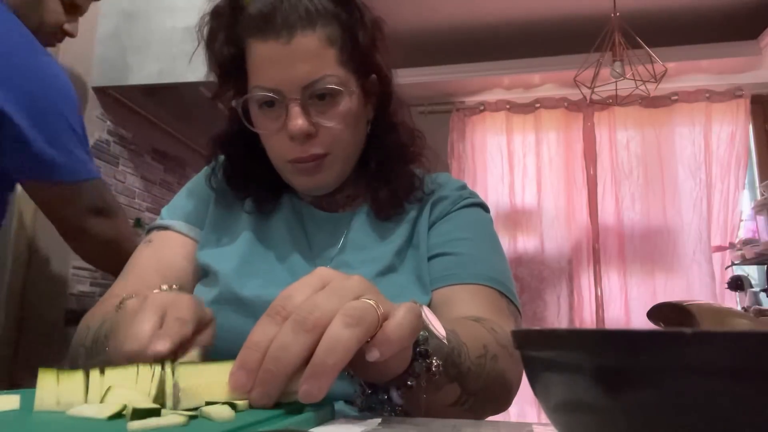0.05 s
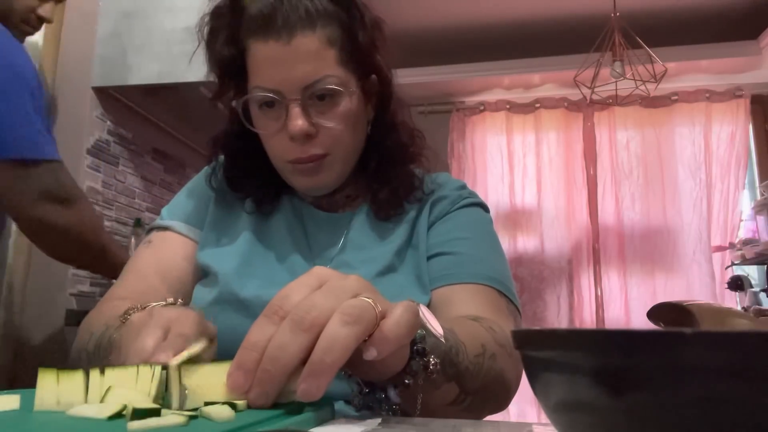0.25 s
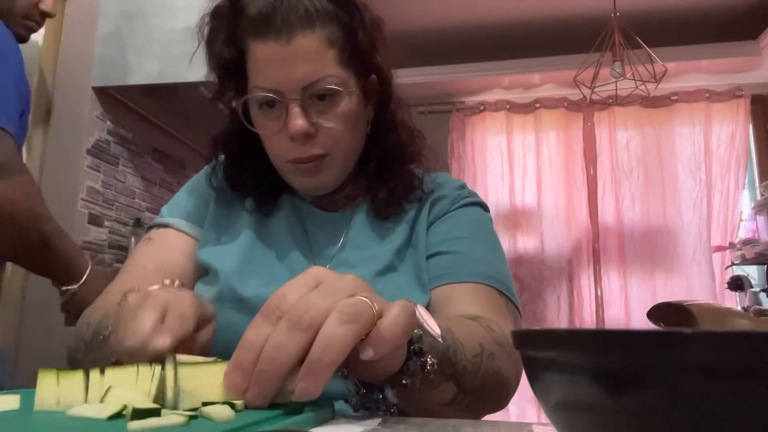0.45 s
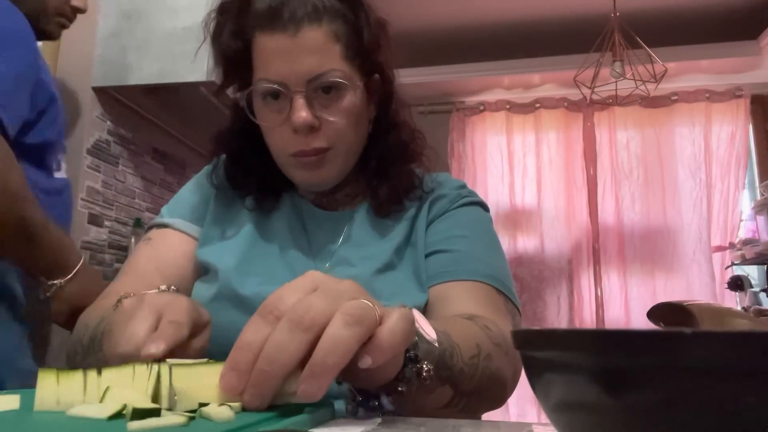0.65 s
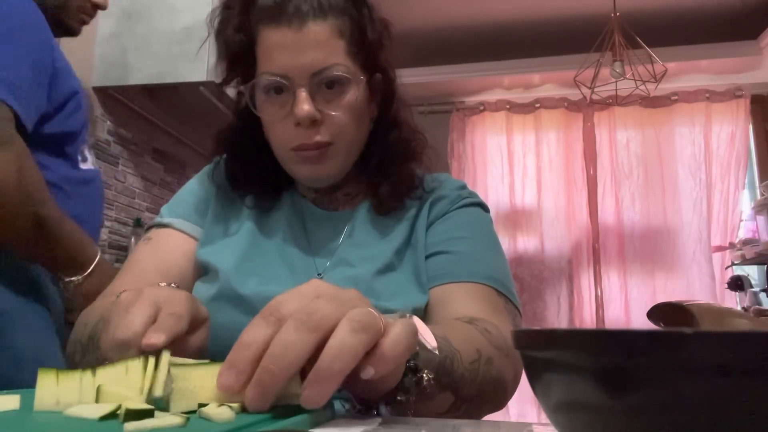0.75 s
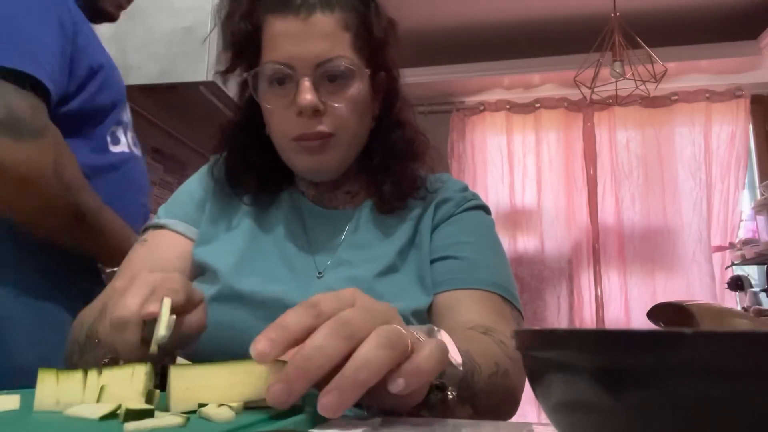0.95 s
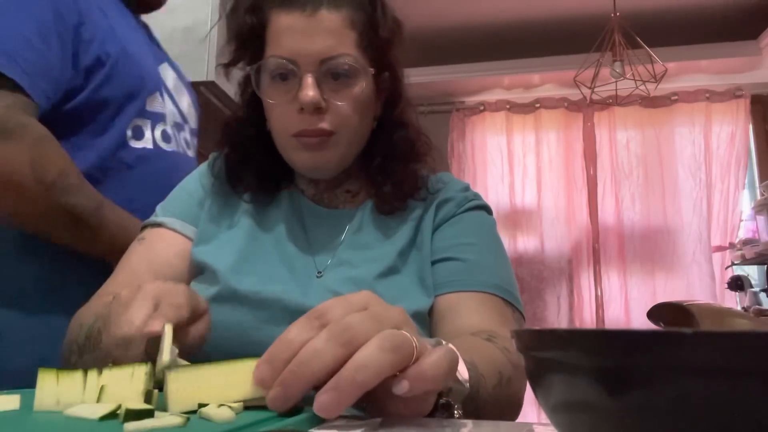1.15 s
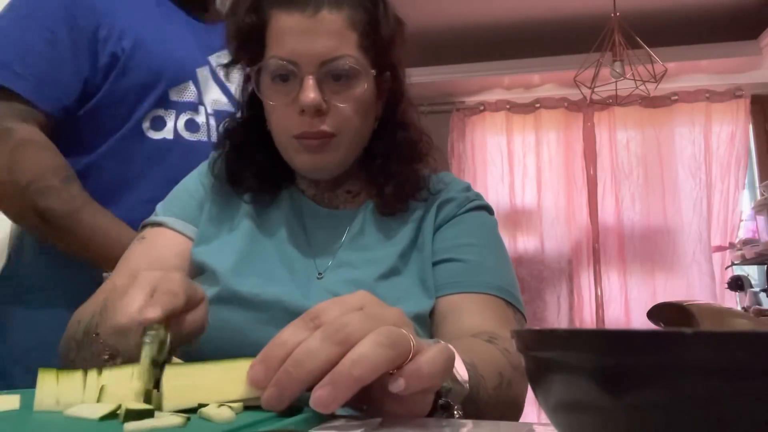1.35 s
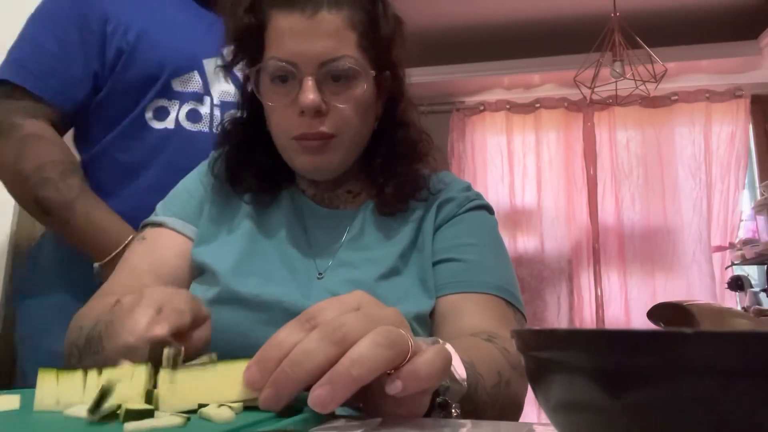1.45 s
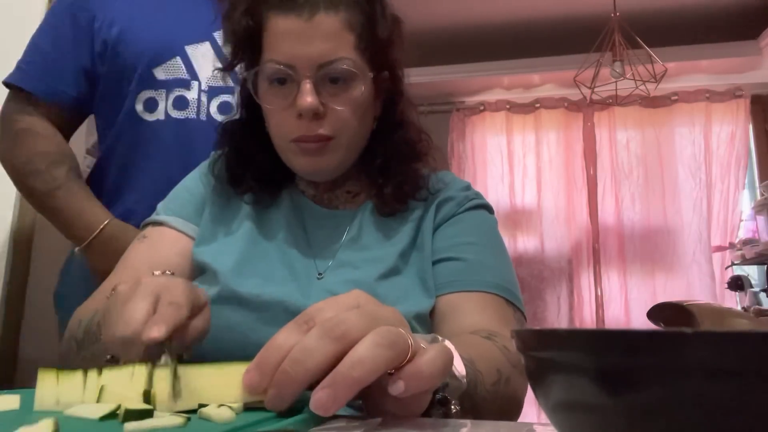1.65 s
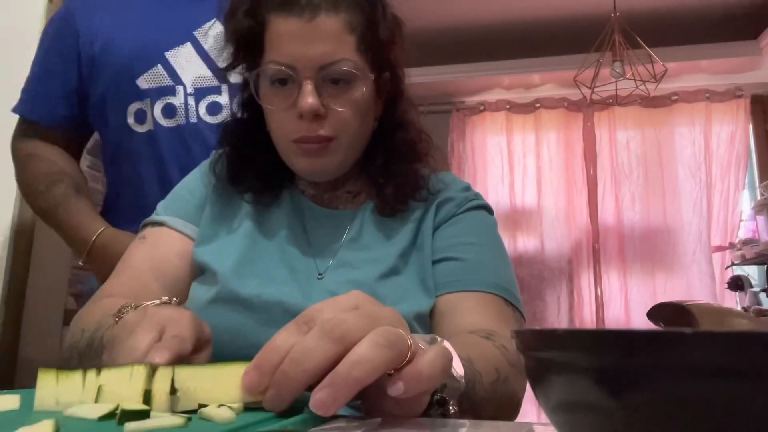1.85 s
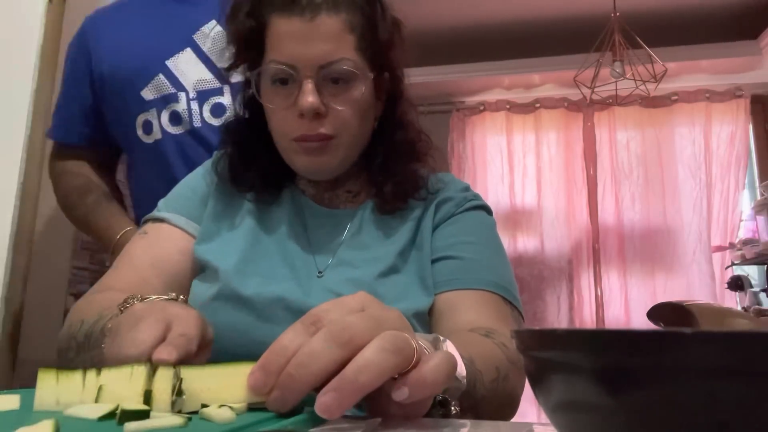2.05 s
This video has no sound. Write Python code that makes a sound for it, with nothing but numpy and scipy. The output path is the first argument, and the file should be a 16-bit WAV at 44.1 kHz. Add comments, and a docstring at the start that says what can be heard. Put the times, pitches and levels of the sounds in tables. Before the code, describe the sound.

A knife chops courgette on a plastic board, with a drawer and cupboard sounding behind.

```python
"""Courgette diced on a plastic board on a kitchen table, close to a stereo pair of microphones. A light tap,
then the blade hisses through the flesh and clacks on the board, while farther back something rattles and rolls
like a drawer. Two more chops, each led in by a faint swell, follow among small taps and distant wooden knocks;
the table booms softly under the hands. Near 1.8 s, with a last, softer chop, a cupboard door thuds across the
room. Quiet room tone lies under it all."""
import sys
import numpy as np
from scipy import signal
from scipy.fft import rfft, irfft
from scipy.io import wavfile
from scipy.ndimage import uniform_filter1d

SR = 44100
rng = np.random.default_rng(int(sys.argv[2]) if len(sys.argv) > 2 else 0)


def generate_wav(sig):
    """Save sig (samples, or channels by samples) to the path in sys.argv[1] as 16-bit PCM at SR."""
    pcm = np.round(np.clip(np.atleast_2d(sig).T, -1, 1) * 32767).astype(np.int16)
    wavfile.write(sys.argv[1], SR, pcm)


N = 92610

# Blade meets board: start_s, level_db, cutoff_hz, tick_db, low_modes_db, room_db
CHOPS = [(0.2466, 0.5, 3348, -28, -18.5, -1.5), (0.4887, 0.5, 3000, -31.5, -22.5, -3),
         (1.213, 0, 3560, -20.5, 1, 0), (1.7790, -5.5, 1944, -25, -11, -29)]
# Light touches of blade and dice: start_s, level_db, cutoff_hz
TAPS = [(.004, -27, 3056), (0.698, -36.5, 2500), (1.081, -46, 4070), (1.181, -33.5, 4960),
        (1.463, -37, 4500), (1.482, -44, 4070), (1.644, -36, 1750)]
# Modes of the board: pitch_hz, level_db, t60_s, left_over_right_db
BOARD_MODES = [(177, -23.5, 0.015, -7), (410, -29.5, 0.031, -7), (822, -22.5, 0.05, 13),
               (1220, -23, 0.036, -0.5), (1338, -8.5, 0.015, 8), (2032, -5.5, 0.01, 2),
               (2410, -11.5, 0.016, -3.5), (2770, -11, 0.0083, -6), (3840, -26, 0.018, -3)]
# Bright tick as heard, with a deep notch at 9 kHz: frequency_hz, level_db
TICK_COLOUR = [(1500, -7.5), (3800, 14.5), (5000, 3.5), (7300, 8.5), (9000, -31), (11500, 6.5),
               (16000, -32)]
# Reflections off the table top and hands: delay_s, left_gain, right_gain
NEAR_ECHOES = [(.0026, 0.23, -.1), (.0052, -0.03, 0.088), (.0088, 0.097, 0.065), (0.012, -.04, .04)]
# The kitchen's answer to a chop: frequency_hz, level_db
TAIL_COLOUR = [(60, -14), (200, -9), (450, -2), (800, 4), (1300, 4), (1900, -2.5), (2600, -9.5),
               (3600, -13.5), (5000, -30), (7500, -27.5), (12000, -40.5), (16000, -49)]
# Brief hisses between the chops, and faint swells leading into two of them: start_s, hold_s, level_db,
# tilt_db_per_octave
HISSES = [(0.188, 0.024, -40.5, -3.5), (.481, 0.012, -29, -5.5), (0.923, 0.038, -64.5, 2.5),
          (1.034, 0.029, -68, 9), (1.177, 0.011, -50.5, -4), (1.201, 0.0081, -30, -4.5),
          (1.502, 0.022, -37, -1.5), (1.761, 0.037, -50.5, 5.5), (1.93, 0.043, -57.5, 4)]
# Hiss as heard, with a deep notch at 9 kHz: frequency_hz, level_db
HISS_COLOUR = [(300, -3), (1200, 0), (2000, -5), (2800, 3), (4000, 4), (5000, 1.5), (6800, 1), (9000, -20),
               (11500, -3), (16000, -24)]
# Hands pushing on the table: start_s, boom_db, thump_db
PUSHES = [(.005, -45, -48), (0.168, -47.5, -48), (0.272, -39, -50), (.355, -40, -64), (0.424, -40, -67.5),
          (0.505, -35.5, -36), (0.659, -47, -39), (1.185, -34, -31), (1.217, -36, -51), (1.4, -43, -50.5),
          (1.469, -37, -32), (1.505, -63, -33), (1.619, -33.5, -33.5), (1.653, -35, -66),
          (1.745, -38.5, -59), (1.815, -39, -34.5)]
# Rattle of the drawer's contents: frequency_hz, level_db
RATTLE_COLOUR = [(100, -36.5), (500, -17.5), (780, 14), (1400, 1), (2500, -7), (3600, 1), (5000, -11.5),
                 (6500, -9), (7700, -18.5), (9000, -19), (10500, -7), (13000, -8.5), (14200, -34.5)]
# Decay of the rattle: frequency_hz, t60_s
RATTLE_T60 = [(500, 0.13), (3000, 0.14), (7000, 0.56), (13000, 0.15)]
# Metal ringing in the drawer: pitch_hz, level_db, t60_s
METAL_MODES = [(1810, -42.5, .45), (3506, -43, 0.67), (3800, -47.5, .4), (5000, -45, .42),
               (6470, -44.5, .38), (7630, -32, .26), (11150, -42.5, 0.21)]
# Roll of the runners: frequency_hz, level_db
ROLL_COLOUR = [(50, -22), (130, -8), (230, 1.5), (330, -9), (550, -8.5), (760, -4.5), (920, -8),
               (1200, -9.5), (1600, -16), (3500, -24), (8000, -49)]
# Decay of the roll: frequency_hz, t60_s
ROLL_T60 = [(200, 0.57), (700, 0.41), (3000, 0.083)]
# Hollow resonances of the drawer: pitch_hz, width_hz, level_db
HOLLOW_MODES = [(233.5, 16, -40.5), (638, 40, -38), (730, 47, -38.5), (880, 26, -42.5), (1258, 90, -46.5)]
# Knocks on cupboard wood across the room: start_s, level_db, tilt_db_per_octave
KNOCKS = [(0.094, -40, -4), (.655, -41, -2.5), (.745, -46, -8), (.805, -46.5, -3), (.915, -59.5, 5),
          (1.104, -48.5, -9.5), (1.768, -23, -4), (1.784, -24, -5), (1.806, -45.5, 9),
          (1.875, -38.5, -10.5)]
# Modes of the cupboard: pitch_hz, level_db, t60_s
CUPBOARD_MODES = [(275.5, -4, 0.24), (325.5, -10, 0.27), (401.8, -3, 0.17), (502, -10, 0.42),
                  (655, -7, 0.33), (717, -8.5, 0.43), (864.5, -12, 0.32)]
# Room blur around a knock: frequency_hz, level_db
KNOCK_COLOUR = [(50, -25), (130, -13.5), (280, -8.5), (330, -11.5), (400, 1.5), (450, -15), (560, -3),
                (690, 1.5), (950, -5), (1200, -4), (1900, -11.5), (2800, -23.5), (6000, -33.5),
                (14000, -59)]
# Decay of that blur: frequency_hz, t60_s
KNOCK_T60 = [(150, 0.44), (700, 0.35), (2000, 0.28), (10000, 0.29)]
# Kitchen reverberation of the hisses: frequency_hz, level_db
ROOM_COLOUR = [(60, 0), (300, 4), (700, 2), (1400, -6.5), (2500, -17), (5000, 1), (15000, 12)]
# Decay of the kitchen: frequency_hz, t60_s
ROOM_T60 = [(100, 0.3), (500, 0.46), (1300, 0.44), (3000, 0.46), (12000, 0.25)]
# Room tone: frequency_hz, level_db
AIR_COLOUR = [(25, -10), (70, -6.5), (200, -4.5), (500, -7), (1000, -12.5), (2500, -22.5), (6000, -30),
              (12000, -33.5), (16000, -43.5)]
# Rise and fall of the room tone: time_s, level_db
AIR_LEVEL = [(0, 14.5), (.7, 8), (0.951, 4), (1.121, -2.5), (1.4, 10.5), (1.699, 10), (2.1, 5.5)]
# Likeness of the sound at the two microphones: frequency_hz, correlation
MIC_CORRELATION = [(60, .9), (250, 0.68), (650, -0.12), (1400, 0.09), (3000, 0.17), (7000, -0.38),
                   (15000, -0.25)]
# Balance between the microphones: frequency_hz, left_over_right_db
MIC_BALANCE = [(60, -1), (200, -3), (550, -2.5), (1600, -1.36), (15000, -.5)]

T = np.arange(SR) / SR  # one second, the span of each event


def knife():
    """Close up: full chops and light touches of the blade on the board."""
    out = np.zeros((2, N))
    for start_s, db, cutoff_hz, tick_db, low_db, room_db in CHOPS:
        add(out, start_s, amp(db) * strike(cutoff_hz, tick_db, low_db, room_db))
    add(out, 0, amp(-35) * die_away(noise(TAIL_COLOUR), ROOM_T60))  # an earlier chop dying in the room
    for start_s, db, cutoff_hz in TAPS:
        add(out, start_s, amp(db) * strike(cutoff_hz, tick_db=-15.5, low_db=2, room_db=6))
    return out


def strike(cutoff_hz, tick_db, low_db, room_db):
    """The blade rings the damped board; near surfaces and then the room answer."""
    split_hz, bend_hz = 900, 1030
    modes = [(hz, pan(side_db) * amp(db) * fade(t60) * sine(hz)) for hz, db, t60, side_db in BOARD_MODES]
    clack = butter(sum(mode for hz, mode in modes if hz >= split_hz), "high", hz=720)
    body = amp(low_db) * sum(mode for hz, mode in modes if hz < split_hz)
    ring = butter(clack + body, "band", hz=[144, cutoff_hz], order=4)
    lag = np.exp(-2 * np.pi * bend_hz / SR)
    ring = signal.lfilter([lag, -1], [1, -lag], ring)  # all-pass: low bending waves arrive last
    direct = ring + amp(tick_db) * noise(TICK_COLOUR) * fade(t60=.013)
    out = direct.copy()
    for delay_s, left, right in NEAR_ECHOES:
        add(out, delay_s, direct * np.array([[left], [right]]))
    early = amp(-24.5) * noise(TAIL_COLOUR) * fade(t60=.17)
    late = amp(-30) * die_away(noise(TAIL_COLOUR), ROOM_T60)
    return out + amp(room_db) * (early + late) * flicker(db=-1, size=80) * (T > .002)


def hiss_and_rub():
    """Close up: brief grainy hisses around the chops; the blade face rubs once with a falling pitch."""
    out = np.zeros((2, N))
    for start_s, hold_s, db, tilt_db in HISSES:
        grains = noise(HISS_COLOUR, tilt_db=tilt_db) * flicker(db=3.2, size=40)
        hiss = grains * rise(.002) * fade(t60=.045, hold_s=hold_s)
        add(out, start_s, amp(db) * (hiss + amp(-9) * kitchen_reverb(hiss)))
    rub_start_s, rub_hz = 1.528, np.interp(T, [0, .09], [1220, 845])
    rub = resonance(rub_hz, width_hz=300) * rise(.002) * fade(t60=1)
    add(out, rub_start_s, amp(-46.5) * rub)
    return out


def table():
    """Under the board: each push gives a short thump and a low boom of the table top."""
    out = np.zeros((2, N))
    rise_s = .0018
    boom = sine(hz=80.25) * fade(t60=.36) * (1 - np.exp(-T / rise_s))
    thump = sine(hz=164.7) * fade(t60=.048) * rise(rise_s)
    for start_s, boom_db, thump_db in PUSHES:
        add(out, start_s, amp(boom_db) * boom + amp(thump_db) * thump)
    return out * pan(db=-7)


def drawer():
    """Farther back: a bright rattle of metal contents over the hollow roll of the runners."""
    out = np.zeros((2, N))
    rattle_start_s, roll_start_s, roll_hold_s = .2115, .213, .15
    judder = flicker(db=3, size=120)
    metal = sum(amp(db) * fade(t60) * resonance(hz, width_hz=260) for hz, db, t60 in METAL_MODES)
    rattle = amp(-26.5) * die_away(noise(RATTLE_COLOUR) * judder, RATTLE_T60, hold_s=.025)
    add(out, rattle_start_s, (rattle + metal) * rise(.006))
    hollow = sum(amp(db) * resonance(hz, width) * balance(hz) for hz, width, db in HOLLOW_MODES)
    hollow *= fade(t60=.52, hold_s=roll_hold_s)
    roll = amp(-33) * die_away(noise(ROLL_COLOUR), ROLL_T60, roll_hold_s)
    add(out, roll_start_s, (roll + hollow) * rise(.012))
    return out


def cupboard():
    """Across the kitchen: knocks ring wooden modes, blurred by the room; the loudest two make the thud."""
    out = np.zeros((2, N))
    ring_gain = amp(-2) * balance(CUPBOARD_MODES[0][0])
    for start_s, db, tilt_db in KNOCKS:
        ring = sum(amp(mode_db) * fade(t60) * sine(hz, rng.random((2, 1)))
                   for hz, mode_db, t60 in CUPBOARD_MODES)
        blur = amp(-4) * die_away(noise(KNOCK_COLOUR, tilt_db=tilt_db), KNOCK_T60)
        add(out, start_s, amp(db) * (ring_gain * ring + blur) * rise(.00067))
    return out


def kitchen_reverb(x):
    """Diffuse reflections build up and die away."""
    tail = die_away(noise(ROOM_COLOUR), ROOM_T60) * rise(.012)
    return signal.fftconvolve(x, unit(tail) / np.sqrt(SR), axes=1)[:, :SR]


def room_tone():
    """All around: the quiet air of the kitchen, its level dipping midway."""
    level_db = np.interp(np.arange(N) / SR, *np.transpose(AIR_LEVEL))
    return noise(AIR_COLOUR, size=N) * amp(level_db - 60.5)


def noise(colour, size=SR, tilt_db=0):
    """Coloured noise as it reaches the two microphones from the room."""
    hz = np.fft.rfftfreq(size, 1 / SR)
    left, independent = rfft(rng.standard_normal((2, size)))
    likeness = np.clip(at_hz(MIC_CORRELATION, hz), -1, 1)
    right = likeness * left + np.sqrt(1 - likeness ** 2) * independent
    shape = amp(at_hz(colour, hz) + tilt_db * np.log2(hz + 20))
    return unit(irfft(np.array([left, right]) * balance(hz) * shape, size))


def resonance(hz, width_hz):
    """A narrow band of noise around a steady or moving pitch."""
    white = rng.standard_normal((2, SR)) + 1j * rng.standard_normal((2, SR))
    band = butter(white, "low", width_hz / 2)
    cycles = np.cumsum(hz * np.ones(SR)) / SR
    return unit((band * np.exp(2j * np.pi * cycles)).real)


def flicker(db, size):
    """A gain that wanders by about db, smoothed over size samples."""
    return unit(amp(db * unit(uniform_filter1d(rng.standard_normal(SR), size))))


def die_away(x, t60s, hold_s=0):
    """After a hold, each band decays at its own speed."""
    hz, t, bands = signal.stft(x, SR, nperseg=256)
    bands = bands * fade(at_hz(t60s, hz)[:, None], hold_s, t)
    return signal.istft(bands, SR, nperseg=256)[1][:, :SR]


def fade(t60, hold_s=0, t=T):
    """After a hold, a fall of 60 dB every t60 seconds."""
    return np.exp(-np.log(1000) * np.maximum(t - hold_s, 0) / t60)


def rise(seconds):
    """Linear attack."""
    return np.minimum(T / seconds, 1)


def sine(hz, phase_cycles=0):
    """A pure tone."""
    return np.sin(2 * np.pi * (hz * T + phase_cycles))


def butter(x, kind, hz, order=2):
    """Butterworth filter."""
    return signal.sosfilt(signal.butter(order, hz, kind, fs=SR, output="sos"), x)


def balance(hz):
    """Gains at the two microphones for room sound of this frequency."""
    return pan(at_hz(MIC_BALANCE, hz))


def pan(db):
    """Left and right gains for a level difference."""
    return amp(np.array([[.5], [-.5]]) * db)


def amp(db):
    """Decibels to gain."""
    return 10 ** (np.asarray(db) / 20)


def unit(x):
    """Scales to rms 1."""
    return x / np.sqrt(np.mean(x ** 2) + 1e-20)


def at_hz(points, hz):
    """Reads a table on a log-frequency axis."""
    frequencies, values = np.transpose(points)
    return np.interp(np.log(hz + 1), np.log(frequencies + 1), values)


def add(mix, start_s, sound):
    """Lays a sound into the mix."""
    part = mix[:, round(start_s * SR):][:, :sound.shape[-1]]
    part += sound[..., :part.shape[1]]


def scene():
    """The close knife work, the distant woodwork and the room tone together."""
    return room_tone() + knife() + hiss_and_rub() + table() + drawer() + cupboard()


def record(dry):
    """The recorder rounds off peaks, cuts rumble and limits the top of the band."""
    ceiling, top_hz = .82, 16400
    limited = dry / (1 + (dry / ceiling) ** 8) ** (1 / 8)
    low_cut = butter(limited, "high", hz=45)
    band_limit = signal.firwin(255, top_hz, window=("kaiser", 9), fs=SR)
    return signal.oaconvolve(low_cut, band_limit[None], "same")


dry = scene()
out = record(dry)
generate_wav(out)
```